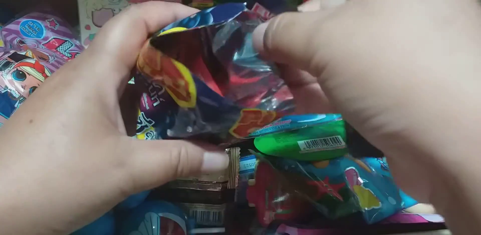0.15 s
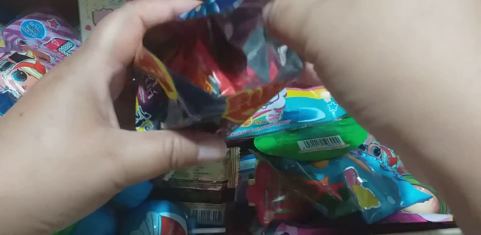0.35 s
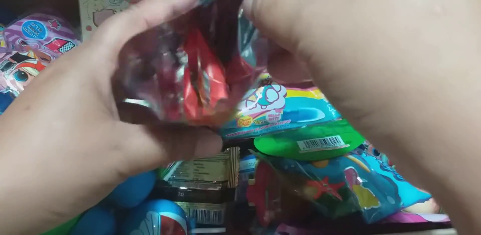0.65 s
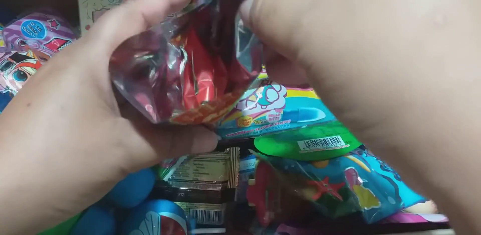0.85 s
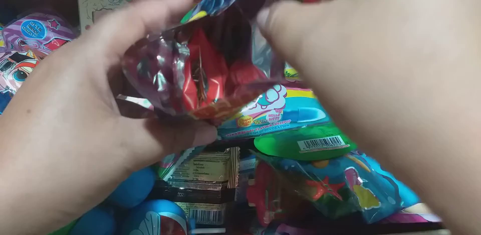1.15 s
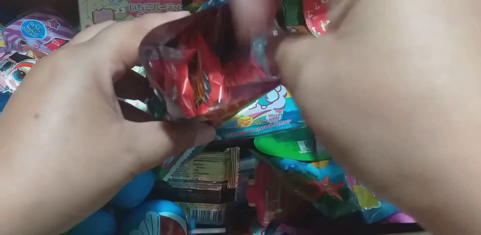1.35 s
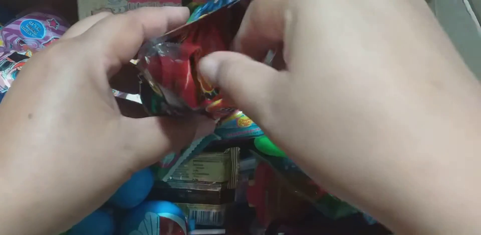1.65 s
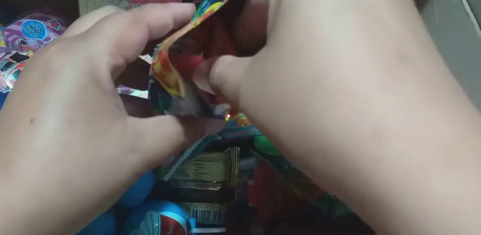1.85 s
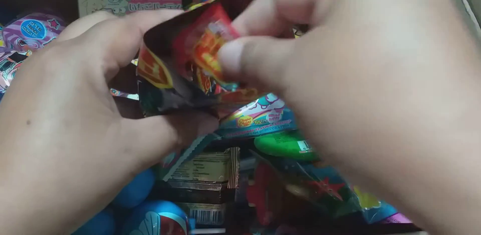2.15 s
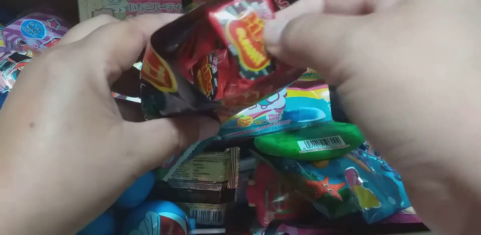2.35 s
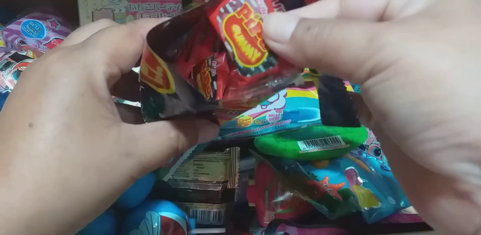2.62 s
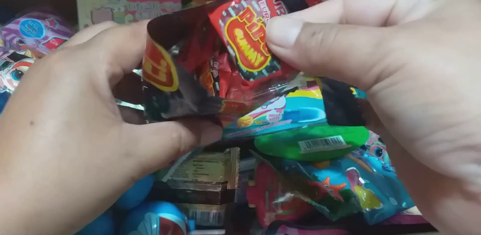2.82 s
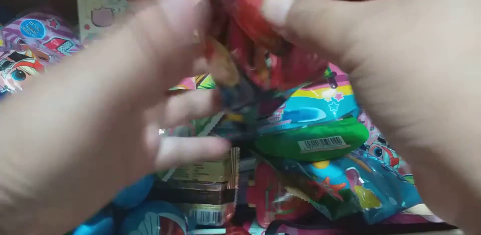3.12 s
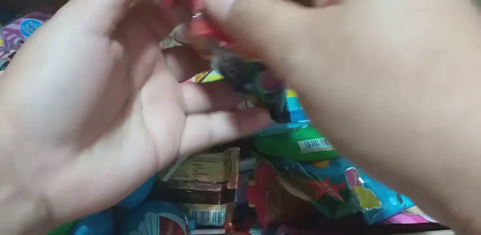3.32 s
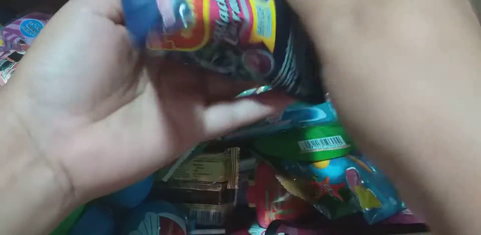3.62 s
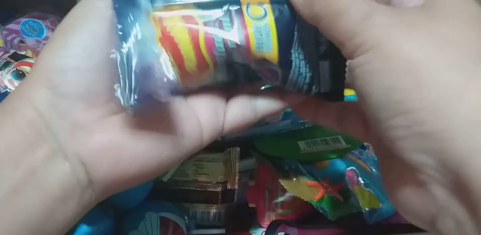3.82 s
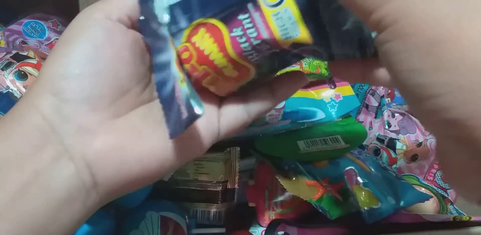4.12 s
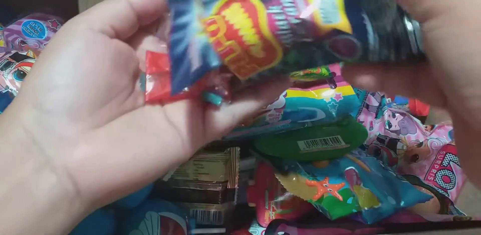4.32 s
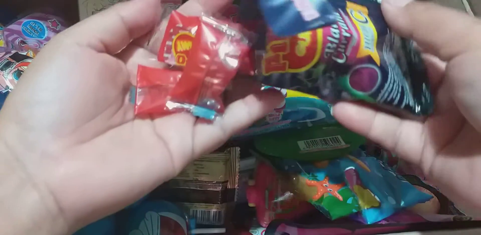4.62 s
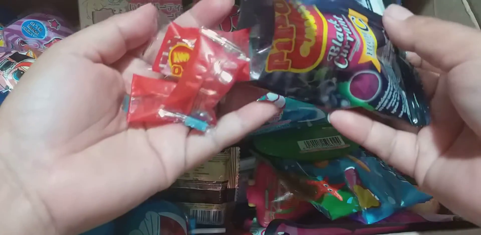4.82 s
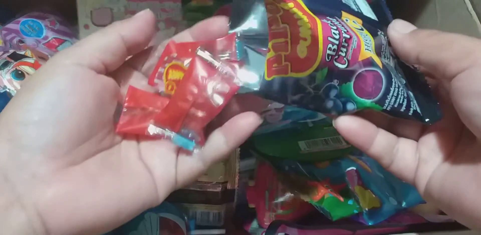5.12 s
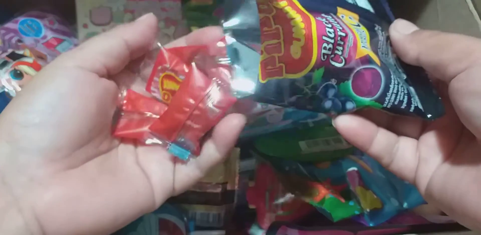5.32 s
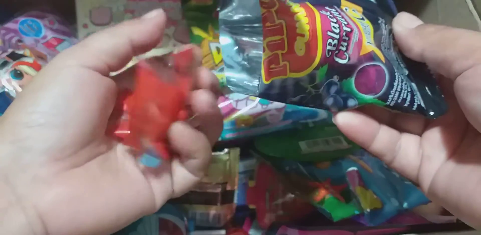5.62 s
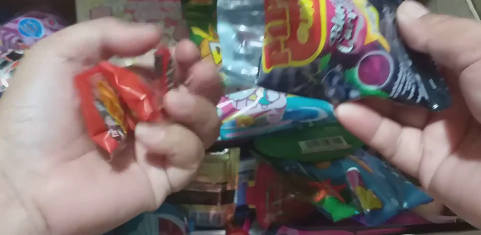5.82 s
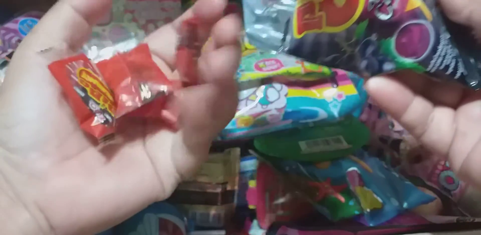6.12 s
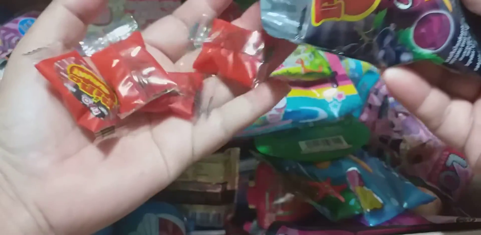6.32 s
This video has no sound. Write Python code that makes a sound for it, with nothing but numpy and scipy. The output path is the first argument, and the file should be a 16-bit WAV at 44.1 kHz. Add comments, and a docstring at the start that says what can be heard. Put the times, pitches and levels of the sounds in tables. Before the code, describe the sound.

Hands work a foil-lined plastic candy bag very close to the microphone in a small dry room. Irregular sharp snaps, fine crackles and grainy sliding rustle come in bursts, with soft low pops from bumps on the bag. A lull precedes the loudest flurry at about three seconds, as the bag is shaken; later, small sweet wrappers crinkle more quietly and thinly over a faint low room hum.

```python
"""Sharp snaps and rustle, close to the microphone: hands pull open a foil-lined plastic candy bag and fish in it.
Each snap is a buckling crease: a click, a ringing facet and noise that dies away in the film.
Tiny random crackles and a grainy sliding hiss follow the moves of the fingers; low pops are bumps on the bag.
Later wrapped sweets are shaken into a palm, and the same film sounds lose the body of the bag.
A small, dry room answers with one reflection and a short tail, and hums quietly behind."""
import sys
import numpy as np
from scipy import signal
from scipy.io import wavfile

SR = 44100
rng = np.random.default_rng(int(sys.argv[2]) if len(sys.argv) > 2 else 0)


def to_wav(sig):
    """Store sig (one row per channel, or 1-D mono) as 16-bit WAV at the path in sys.argv[1].

    Samples outside -1..1 are clipped; the rate is SR.
    """
    pcm = np.clip(np.atleast_2d(sig), -1, 1) * 32767
    pcm = np.round(pcm).astype(np.int16)
    wavfile.write(sys.argv[1], SR, pcm.T)  # frames by channels


N = 284886

# the parts of the film sound, thud / hollow / crack / sizzle: low f/Hz, high f/Hz
FILM_BANDS = [(160, 600), (600, 2500), (2500, 8000), (8000, 16500)]


def from_db(db):
    """Decibels to gain."""
    return 10 ** (np.asarray(db) / 20)


def rms_one(x):
    """Scale to rms 1."""
    return x / np.sqrt(np.mean(x ** 2) + 1e-20)


def unit_energy(x):
    """Scale so that the squares sum to 1."""
    return x / np.sqrt(np.sum(x ** 2) + 1e-20)


def add(out, s, sound):
    """Mix a sound into out, starting at s seconds."""
    start = int(np.clip(round(s * SR), 0, N - 1))
    out[start:start + len(sound)] += sound[:N - start]


def band(low, high, order=2):
    """Sections of a Butterworth band-pass."""
    return signal.butter(order, [low, high], "band", fs=SR, output="sos")


def resonate(x, hz, width_hz):
    """Two-pole resonance with gain close to 1 on top."""
    r = np.exp(-np.pi * width_hz / SR)
    numerator = np.array([1, 0, -1]) * (1 - r * r) / 2
    denominator = [1, -2 * r * np.cos(2 * np.pi * hz / SR), r * r]
    return signal.lfilter(numerator, denominator, x + 1e-18)


def drift(rate):
    """Random curve of rms 1 with a new target rate times a second."""
    count = int(N / SR * rate) + 2
    targets = rng.standard_normal(count)
    return rms_one(np.interp(np.arange(N) / SR * rate, np.arange(count), targets))


def coloured_noise(spectrum, count):
    """Bands of noise that follow a spectrum; rms 1."""
    hz, level_db = np.transpose(spectrum)
    edges = np.geomspace(hz[0], hz[-1], count + 1)
    # neighbouring bands take different noises, so that their overlaps do not interfere
    white, out = rng.standard_normal((2, N)), 0
    for k, (low, high) in enumerate(zip(edges, edges[1:])):
        gain_db = np.interp(np.log(low * high) / 2, np.log(hz), level_db)
        out = out + from_db(gain_db) * signal.sosfilt(band(low, high), white[k % 2])
    return rms_one(out)


def colour(x, resonances):
    """Favour some pitches and swallow others, by resonances mixed in with or against the sound."""
    for hz, width_hz, gain_db in resonances:
        x = x + (from_db(gain_db) - 1) * resonate(x, hz, width_hz)
    return x


def snaps(click, facet_q, damping_hz, ring_db, ring_db_per_octave, usual_facet_hz,
          flutter_s, flutter_db, thud_s, part_db):
    """A crease flips with a click, its facet rings, and bending waves scatter through the film and die."""
    # the clearest creases buckling: t/s, level/dB (before part_db), time constant/s, facet f/Hz,
    # then relative to the crack: hollow level/dB, sizzle level/dB
    creases = [(.0093, -30.5, 0.00099, 1870, -2.5, -4), (.048, -35, 0.001, 4380, -2.5, -14),
               (.1, -34, .0012, 3120, -8.5, -0.5), (0.12, -36.5, .0023, 805, 0.5, -9),
               (0.155, -35.5, 0.0018, 1560, -1, -4), (0.1706, -34.5, 0.0028, 3150, -5, -17),
               (0.2084, -25, 0.0027, 4770, -6.5, 0), (0.224, -27, 0.0019, 11300, -1.5, 0.5),
               (0.27, -29, 0.00086, 7900, -9, -2.5), (0.2875, -30.5, 0.011, 3570, -6.5, -5),
               (0.3027, -27.5, 0.004, 5440, -9, -5), (0.3378, -29.5, .0046, 4220, -21, -4),
               (0.3432, -27.5, .0013, 4100, -15, -4.5), (.358, -28, 0.00055, 4640, -28, -5),
               (0.4485, -32, .0074, 5770, -2.5, -8), (0.5113, -32.5, 0.0037, 7800, -7, -4.5),
               (0.5704, -41.5, .0009, 5030, -14, -3), (.6336, -19, 0.003, 5200, -11, -3),
               (.6835, -39.5, 0.0023, 6650, -9, -5), (0.7234, -18, 0.0043, 8100, -10, 3.5),
               (.7778, -36.5, 0.0052, 3800, -0.5, -17), (0.7897, -51, .001, 12900, -6, 13),
               (0.8121, -31.5, .0032, 5630, -8, -2.5), (0.8744, -58.5, .0021, 1650, 15, -25),
               (0.9155, -46, 0.0088, 10100, -11, 16), (0.9453, -26.5, 0.00045, 6340, -16.5, -6.5),
               (0.9749, -53, 0.0046, 1570, 11.5, -19), (1.0112, -46, 0.0015, 1300, 2.5, -23),
               (1.0391, -36, 0.0038, 2360, 1.5, -14), (1.1502, -39, 0.0012, 5420, 0.5, -7),
               (1.2447, -38.5, 0.0066, 8100, -7.5, -3), (1.3422, -24, .0011, 7920, -7.5, -0.5),
               (1.434, -31.5, 0.0011, 4110, -8.5, -9.5), (1.4974, -31.5, 0.0019, 5430, -2.5, -4),
               (1.5749, -48.5, 0.00071, 13000, -20, 7.5), (1.5859, -36, 0.0015, 4540, -3, -15),
               (1.6129, -29, 0.0059, 3470, -5.5, -2), (1.6244, -39, 0.004, 1650, 0.5, -17),
               (1.7135, -34.5, 0.0081, 5100, -2, -7), (1.7238, -28.5, 0.012, 8100, -7, -1.5),
               (1.779, -43, .0013, 1616, -1, 1), (1.8019, -33.5, 0.0021, 4370, -27, -13),
               (1.8184, -31.5, 0.0017, 4800, -5.5, 0.5), (1.8835, -36.5, .0015, 4600, -6, -17),
               (1.9133, -30.5, 0.00068, 1670, 1.5, -6), (1.9301, -24.5, 0.007, 4310, -22, -2),
               (1.9545, -25, 0.002, 5050, -3.5, -2.5), (2.0048, -24.5, 0.002, 6390, -20, -5.5),
               (2.0403, -29.5, .0016, 5470, -28, -3), (2.0719, -25, 0.0038, 3140, -13, -2.5),
               (2.108, -24, 0.00033, 5500, -36, -14), (2.1135, -27.5, .0006, 4730, -15, -5),
               (2.1536, -33.5, .0011, 6236, -7.5, -5), (2.1834, -34, 0.00083, 5730, -25, -13),
               (2.208, -41, 0.0087, 3640, 1, -24), (2.291, -37, .0021, 5500, -16, -8.5),
               (2.342, -48, 0.0021, 5160, -0.5, -17), (2.5355, -32.5, 0.0038, 6070, -4, -4),
               (2.578, -32, 0.0031, 7100, -18, -1), (2.5996, -30, 0.00075, 8470, -18, 3.5),
               (2.853, -53.5, 0.0011, 7030, -2.5, -7), (2.8849, -38, 0.0033, 5600, -7.5, -4.5),
               (2.9419, -27, 0.0018, 11820, -5, 1), (2.9521, -19.5, .0038, 3170, -10, 0),
               (2.985, -21.5, 0.0037, 7900, -5, -1), (3.004, -22, 0.0022, 6300, -10, -10),
               (3.0608, -36, 0.0017, 7600, -6, 0), (3.0716, -17.5, 0.0071, 3470, -11, -7),
               (3.1301, -21.5, .0011, 5850, -34, -3), (3.1438, -30, 0.0019, 5350, -9, -6),
               (3.2269, -17, 0.0053, 7100, -15.5, -2), (3.2593, -23.5, 0.0058, 5960, -7.5, -3.5),
               (3.2719, -28, 0.0057, 7590, -6, -6), (3.3155, -36.5, 0.0047, 5820, -6, -1),
               (3.3838, -39.5, 0.01, 1900, -2, -2), (3.4621, -32, 0.0025, 9230, -4, -1),
               (3.5923, -21, 0.0011, 2612, 0, -8.5), (3.6979, -30, 0.0017, 5800, -12, 2),
               (3.7214, -24, 0.0092, 7676, -9.5, -5), (3.7635, -33, 0.0017, 4200, -1.5, -8),
               (3.8094, -39, 0.0047, 8050, 0.5, -4), (3.8365, -23, 0.0013, 4570, -10.5, -2),
               (3.8448, -25.5, 0.0059, 2247, -6, -8), (3.8677, -32.5, 0.0015, 5690, -2.5, -4),
               (3.9325, -38.5, 0.0017, 7595, -6, -8), (3.9648, -20, 0.002, 7080, -7, -1),
               (4.0446, -24, 0.0039, 5820, -5, -3.5), (4.128, -41.5, 0.00079, 2195, 8.5, -17),
               (4.1466, -37, 0.0061, 2500, 3, -11), (4.2608, -34, .0027, 5000, -12, 0),
               (4.284, -33, 0.006, 2572, -6, -6), (4.4923, -50, 0.0018, 3790, -3.5, -26),
               (4.5886, -62, .0043, 775, 12, -20), (4.7397, -39, .0017, 1803, 0, -19),
               (4.8094, -34, 0.0016, 2530, -2.5, -14), (4.8542, -49, .0025, 2572, 5, -14),
               (5.0571, -45.5, .0014, 1169, 5, -22), (5.1144, -54, 0.00088, 2804, 2.5, -19),
               (5.2383, -47, 0.0005, 4840, -28, -6), (5.357, -42, 0.0094, 3680, -5.5, -3),
               (5.483, -37, 0.00042, 3714, -5.5, -6.5), (5.4953, -39, 0.00076, 4013, 1, -20),
               (5.5308, -41, 0.003, 2946, -1.5, -4), (5.6001, -42, 0.001, 5890, -23, -24),
               (5.6305, -34.5, 0.0029, 4800, 5.5, -13), (5.6331, -29.5, .0004, 7560, -35, -7.5),
               (5.6709, -37.5, 0.0015, 7300, 2.5, 0.5), (5.7592, -31.5, 0.0015, 6220, -11, -3.5),
               (5.8496, -35.5, 0.0017, 4600, -10, -10), (5.8732, -30.5, 0.0019, 6010, -22, 2.5),
               (5.9287, -34, 0.0015, 7500, -22, -1.5), (5.9779, -38, .0013, 3470, 1, -15),
               (6.1813, -36, 0.0017, 2173, 1.5, -1.5), (6.218, -33.5, 0.00075, 7830, -5.5, -8),
               (6.2371, -30, 0.0017, 10470, -9, 4), (6.4543, -32, 0.00026, 4655, -42, -27)]
    # the thud follows the hollow part; a slower crease moves more of the panel
    base_thud_db, thud_db_per_doubling, usual_crease_s = -12.5, 3.5, .002
    t, out = np.arange(SR // 16) / SR, np.zeros(N)
    filters = [band(low, high, order=3) for low, high in FILM_BANDS]
    for s, level_db, decay_s, facet_hz, hollow_db, sizzle_db in creases:
        scatter, flutter, panel = rng.standard_normal((3, len(t)))
        burst = unit_energy(scatter * np.exp(-t / decay_s))
        burst[0] += click

        # the facet swings up over a few cycles and is damped as quickly
        age = np.pi * (damping_hz + facet_hz / facet_q) * t
        ring = unit_energy(age * np.exp(-age) * np.sin(2 * np.pi * facet_hz * t))
        # a large, low facet rings more strongly than a small one
        facet_db = ring_db + ring_db_per_octave * np.log2(facet_hz / usual_facet_hz)
        crack = unit_energy(burst + from_db(facet_db) * ring)

        # the loose film around the crease shivers too
        film = crack + from_db(flutter_db) * unit_energy(flutter * np.exp(-t / flutter_s))
        # the whole panel moves air more slowly
        thud = unit_energy(panel * np.exp(-t / thud_s)) + film
        thud_db = hollow_db + base_thud_db + thud_db_per_doubling * np.log2(decay_s / usual_crease_s)

        gains = from_db(level_db + np.array([thud_db, hollow_db, 0, sizzle_db]) + part_db)
        sources = [thud, film, film, film]
        parts = [unit_energy(signal.sosfilt(sos, x)) for sos, x in zip(filters, sources)]
        # levels count as rms over 5 ms
        add(out, s, gains @ np.array(parts) * np.sqrt(SR * .005))
    return out


def effort():
    """Rustle and sizzle levels in dB over time: the moves of the fingers add in power."""
    # moves that slide and crease the film, levels before the mix:
    # start t/s, length/s, rustle level/dB, sizzle level/dB relative to the rustle
    moves = [(0, .19, -43, -10.5), (0.201, .15, -38, -14), (0.434, 0.085, -47, -5.5), (0.643, .08, -46, -5),
             (0.816, 0.21, -57, -14), (1.294, 0.068, -51, -11), (1.557, 0.09, -47, -3.5),
             (1.72, .19, -48, -5), (1.93, .17, -38, -7), (2.11, 0.079, -43, -6), (2.195, 0.31, -57, -2),
             (2.531, 0.089, -52, -9), (2.95, 0.062, -36, -5), (3.123, 0.13, -39, -7), (3.3, .26, -48, -4),
             (3.652, .03, -49.5, 0), (3.708, 0.12, -45, -6), (3.84, .18, -41, -7), (4.041, .29, -46, -6),
             (4.509, .2, -65.5, -10), (4.771, 0.062, -56, -6), (5.04, .1, -54, -7.5),
             (5.329, .13, -52.5, -6.5), (5.471, 0.078, -48, -4), (5.651, .12, -43, -6),
             (5.861, 0.082, -42.5, -6), (5.968, .38, -52, -11)]
    # every move swells, holds and dies away; between moves the film barely stirs
    swell_s, release_s, rest_db, rest_sizzle_db = .012, .025, -75, -77.5
    t = np.arange(N) / SR
    rustle, sizzle = from_db(rest_db) ** 2, from_db(rest_sizzle_db) ** 2
    for start, length, level_db, sizzle_db in moves:
        before, after = np.maximum(start - t, 0), np.maximum(t - start - length, 0)
        envelope = np.exp(-before / swell_s - after / release_s)
        rustle = rustle + (from_db(level_db) * envelope) ** 2
        sizzle = sizzle + (from_db(level_db + sizzle_db) * envelope) ** 2
    return 10 * np.log10(rustle), 10 * np.log10(sizzle)


def crackle(level_db, sizzle_db, per_s, size_db, decay_s, facet_q, ring_db, top_db):
    """Tiny facets flip at uneven intervals, more of them the harder the film is worked, each at its own pitch."""
    t, ticks = np.arange(SR // 100) / SR, np.zeros(N)
    # per_s is the rate at an effort of -50.5 dB; the running sum is the number of flips expected so far
    flips = np.cumsum(per_s * from_db((level_db + 50.5) / 3)) / SR
    draws = rng.random((1500, 3))   # interval, size, pitch
    due = np.cumsum(2 * draws[:, 0])
    starts = np.searchsorted(flips, due[due < flips[-1]])
    scatter = rng.standard_normal((len(draws), len(t)))
    for start, (_, size, pitch), waves in zip(starts, draws, scatter):
        burst = waves * np.exp(-t / decay_s)
        hz = 1300 * 8 ** pitch   # three octaves of facets
        ring = unit_energy(resonate(burst, hz, hz / facet_q))
        tick = unit_energy(burst) + from_db(ring_db) * ring
        add(ticks, start / SR, from_db(size_db * size) * unit_energy(tick))
    body = rms_one(signal.sosfilt(band(620, 8000), ticks))
    top = rms_one(signal.sosfilt(band(*FILM_BANDS[-1]), ticks))
    return from_db(level_db) * body + from_db(sizzle_db + top_db) * top


def sliding(level_db, sizzle_db, grip_db, top_db):
    """Film sticks and slips over skin and film in a grainy hiss."""
    # colour of sliding film: f/Hz, relative level/dB per Hz
    rub = [(300, -6), (600, -2.5), (800, 11.5), (1150, -1.5), (1700, -2), (3000, 4.5), (5000, 0),
           (8000, -6)]
    hiss = from_db(level_db) * coloured_noise(rub, count=10)
    top = rms_one(signal.sosfilt(band(*FILM_BANDS[-1]), rng.standard_normal(N)))
    grain = rms_one(from_db(grip_db * np.tanh(drift(400))))
    return (hiss + from_db(sizzle_db + top_db) * top) * grain


def bumps(decay_s, width_hz, sway_hz, sway_db):
    """A soft push on the bag gives a short, low pop, and the whole bag sways beneath it."""
    # fingers bumping the bag: t/s, peak level/dB of the pop before the mix, f/Hz
    pushes = [(.3, -31, 262), (0.445, -36.5, 195), (.723, -25.5, 267), (.874, -37, 418), (.974, -29, 323),
              (1.04, -32.5, 346), (1.622, -37, 340), (1.718, -38, 330), (2.209, -45, 381),
              (2.941, -30.5, 306.7), (2.98, -31, 317.4), (3.034, -33, 377), (3.392, -31, 370),
              (3.594, -35, 396)]
    t, out = np.arange(SR // 8) / SR, np.zeros(N)
    for s, peak_db, hz in pushes:
        push = rng.standard_normal(len(t)) * np.exp(-t / decay_s)
        for mode_hz, mode_db in (hz, 0), (sway_hz, sway_db):
            pop = resonate(resonate(push, mode_hz, width_hz), mode_hz, width_hz)
            add(out, s, from_db(peak_db + mode_db) * pop / np.abs(pop).max())
    return out


def wrappers(film, sweets_cut_hz, sweets_db, sweets_from_s):
    """First the big bag sounds, with its resonances; then the small sweet wrappers, which have little body."""
    # resonances and hollows of the open bag: f/Hz, width/Hz, level/dB
    bag_modes = [(642, 190, -8), (776, 72, 5.5), (1105, 68, -3), (1655, 100, 6.5), (2730, 280, -1),
                 (2900, 140, -1.5), (4780, 1400, 2.5), (5350, 560, -0.5), (8120, 540, -1)]
    # the sweets take over within 50 ms
    share = np.clip((np.arange(N) / SR - sweets_from_s) * 20, 0, 1)
    sweets = signal.sosfilt(signal.butter(2, sweets_cut_hz, "high", fs=SR, output="sos"), film)
    return (1 - share) * colour(film, bag_modes) + share * from_db(sweets_db) * sweets


def room(x, wall_cut_hz, echo_s, echo_db, t60_s, tail_db):
    """One near reflection, then a short, duller tail."""
    t = np.arange(SR // 3) / SR
    # the tail builds up over a few ms and falls by 60 dB in t60_s
    tail = rng.standard_normal(len(t)) * from_db(-60 * t / t60_s) * (1 - np.exp(-t / 0.0028))
    dull = signal.sosfilt(signal.butter(1, wall_cut_hz, fs=SR, output="sos"), tail)
    response = from_db(tail_db) * unit_energy(dull)
    response[int(echo_s * SR)] += from_db(echo_db)
    return x + signal.fftconvolve(x, response)[:N]


def background(air_db):
    """Steady coloured noise of the room, with a wavering hum of noise in narrow resonances."""
    # room noise: f/Hz, relative level/dB per Hz
    air = [(35, -44.5), (47, -6), (60, -15), (82, -2), (105, -10.5), (150, -1), (200, 0.5), (270, -12.5),
           (430, -6.5), (620, -22.5), (1100, -23.5), (3000, -26.5), (7000, -32.5), (10500, -42),
           (16000, -35.5)]
    # low hum and the hums above it: f/Hz, width/Hz, rms level/dB
    hum_bands = [(204, 28.6, -60), (384, 140, -67), (787, 100, -71), (1172, 70, -77)]
    hum = 0
    for hz, width_hz, level_db in hum_bands:
        tone = resonate(resonate(rng.standard_normal(N), hz, width_hz), hz, width_hz)
        hum = hum + from_db(level_db) * rms_one(tone)
    return from_db(air_db) * coloured_noise(air, count=27) + hum


def scene():
    """The bag and the sweets in the hands, close by, in their room."""
    level_db, sizzle_db = effort()
    film = snaps(click=.25, facet_q=35, damping_hz=370, ring_db=-6.5, ring_db_per_octave=-0.5,
                 usual_facet_hz=4480, flutter_s=0.005, flutter_db=-2.5, thud_s=0.0094,
                 part_db=[-.2, -0.38, 0.21, -0.2])
    film = film + from_db(-5.0) * crackle(level_db, sizzle_db, per_s=150, size_db=20.5, decay_s=0.0021,
                                          facet_q=3.8, ring_db=-4.0, top_db=-9.0)
    film = film + from_db(-10.5) * sliding(level_db, sizzle_db, grip_db=4.0, top_db=4.0)
    near = wrappers(film, sweets_cut_hz=1880, sweets_db=3.0, sweets_from_s=5.28)
    near = near + from_db(-5) * bumps(decay_s=0.008, width_hz=160, sway_hz=164, sway_db=-3.5)
    heard = room(near, wall_cut_hz=14000, echo_s=0.012, echo_db=-26, t60_s=0.093, tail_db=-17.5)
    return (heard + background(air_db=-52.5))[None]


def record(dry):
    """The small microphone colours the treble, and the top is cut steeply."""
    # colour of the microphone: f/Hz, width/Hz, level/dB
    capsule = [(8100, 340, 1.5), (9300, 1400, -4.5), (11950, 860, 1), (13600, 890, -3)]
    cutoff_hz = 15850
    steep = signal.ellip(10, .2, 70, cutoff_hz, fs=SR, output="sos")
    return signal.sosfilt(steep, colour(dry, capsule))


dry = scene()
out = record(dry)
to_wav(out)
```